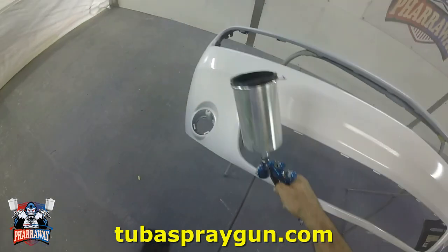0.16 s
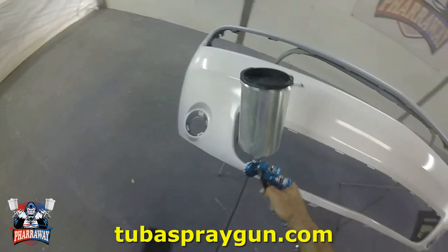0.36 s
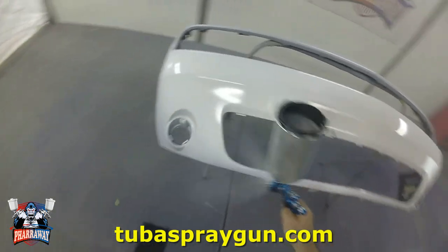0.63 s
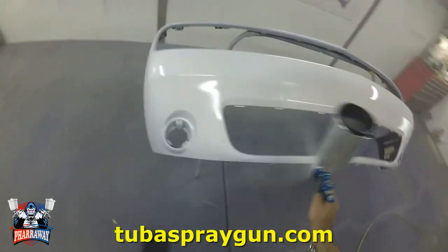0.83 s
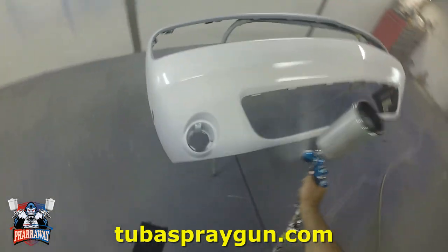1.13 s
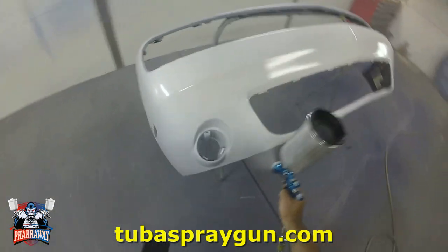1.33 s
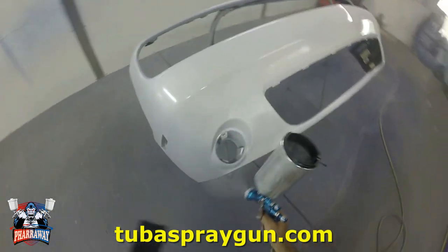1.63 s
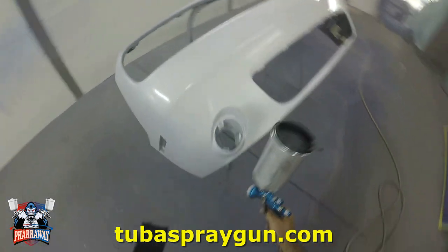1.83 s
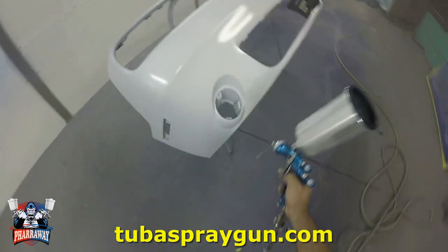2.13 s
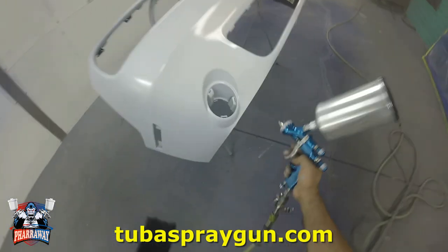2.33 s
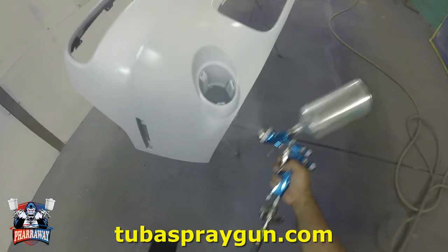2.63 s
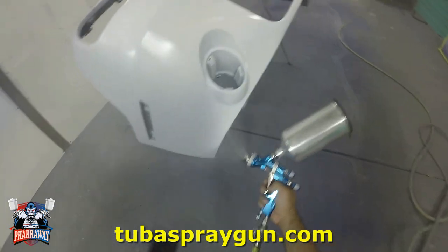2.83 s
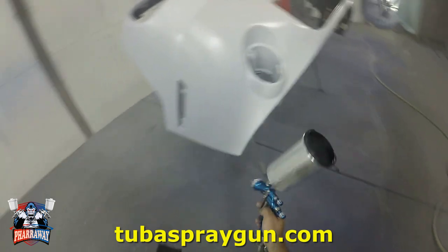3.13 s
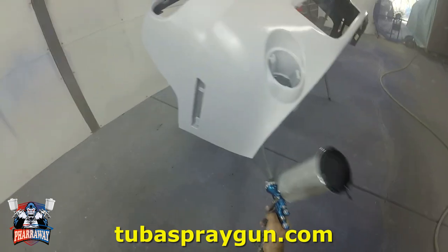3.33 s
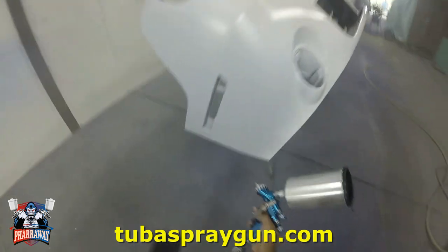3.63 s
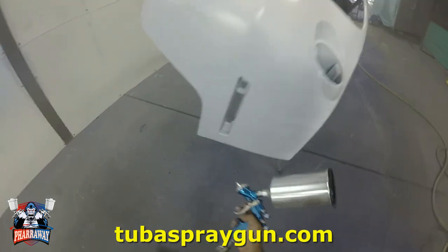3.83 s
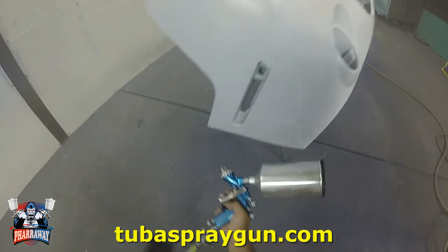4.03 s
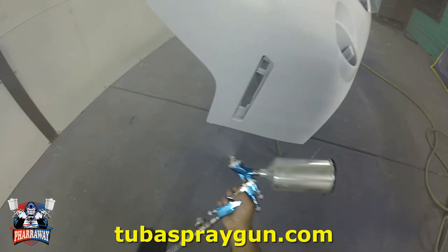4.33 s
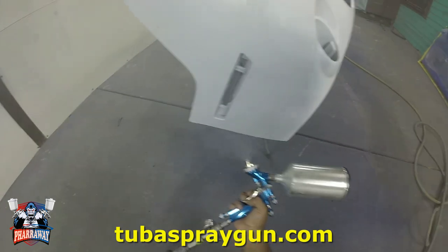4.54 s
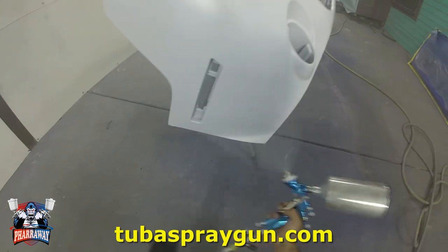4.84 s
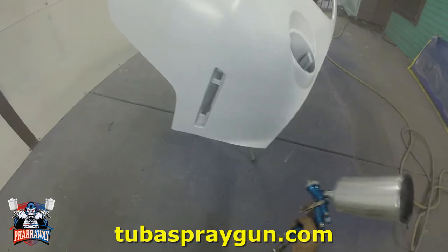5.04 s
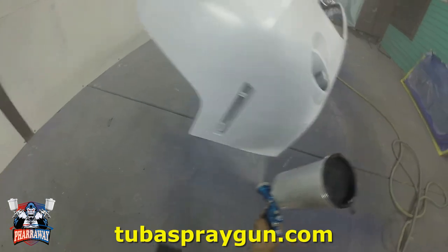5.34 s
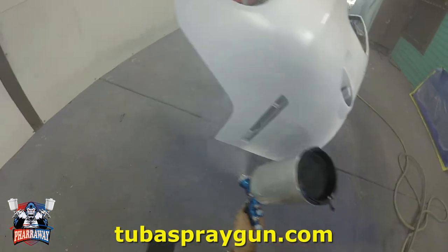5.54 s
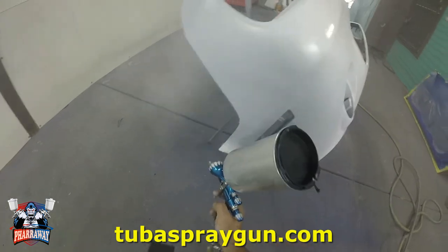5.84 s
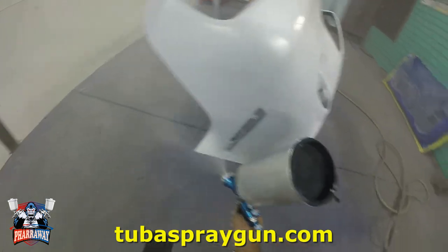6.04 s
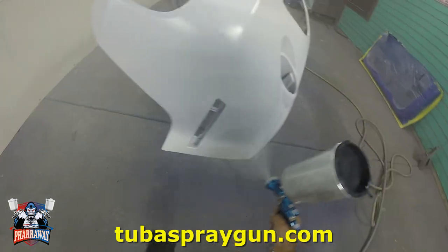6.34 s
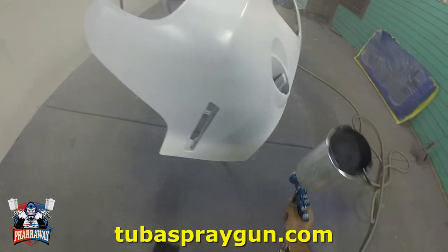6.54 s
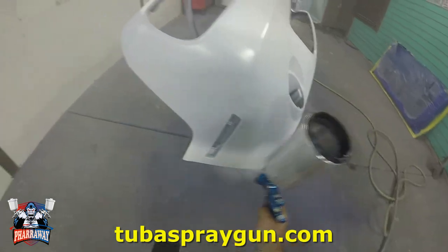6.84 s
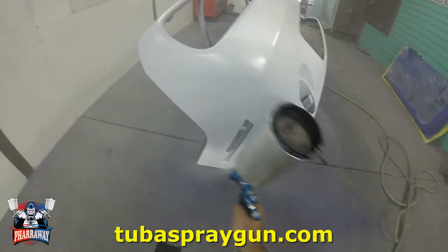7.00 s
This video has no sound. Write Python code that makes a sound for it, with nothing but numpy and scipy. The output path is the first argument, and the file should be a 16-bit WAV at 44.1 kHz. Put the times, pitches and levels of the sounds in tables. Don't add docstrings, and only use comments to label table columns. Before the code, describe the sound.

In a reverberant spray booth, a paint gun fires bright hissing bursts, each opening with a sharp surge and closing quickly into a short wall tail. Air roars softly on a hollow panel. Extractor rush and low hum fill the pauses. A small body-worn camera in a plastic housing colours everything, rumbling with movement, and takes a hard knock during a midway pause.

```python
import sys
import numpy as np
from scipy import signal
from scipy.fft import rfft, irfft, next_fast_len
from scipy.io import wavfile
from scipy.ndimage import uniform_filter1d, map_coordinates

SR = 44100
rng = np.random.default_rng(int(sys.argv[2]) if len(sys.argv) > 2 else 0)


def boost(x):
    u = np.asarray(x, float) / 20
    return 10 ** u


def generate_wav(signal):
    frames = np.transpose(np.atleast_2d(signal))
    scaled = np.clip(frames, -1, 1) * 32767
    pcm = np.round(scaled).astype(np.int16)
    wavfile.write(sys.argv[1], SR, pcm)


N = 316197


def set_level(x, db):
    return x * boost(db) / np.sqrt(np.mean(x ** 2))


def colour(x, gain):
    size = next_fast_len(len(x))
    hz = np.maximum(np.arange(size // 2 + 1) * SR / size, 1)
    return irfft(rfft(x, size) * gain(hz), size)[:len(x)]


def curve(table):
    hz, db = np.transpose(table)
    return lambda f: boost(np.interp(np.log(f), np.log(hz), db))


def wander(rate):
    k = int(SR / rate)
    held = np.repeat(rng.standard_normal(N // k + 1), k)
    return uniform_filter1d(uniform_filter1d(held, k), k)[:N]


def eddies(table, flicker_db, rate):
    noise = colour(rng.standard_normal(N), curve(table))
    f, s, cells = signal.stft(noise, SR, nperseg=512)
    held_s = np.arange(int(N / SR * 40) + 2) / rate
    chance = rng.standard_normal((len(held_s), 32))
    band = 2 * np.log2(np.maximum(f, 1))
    where = np.meshgrid(np.interp(s, held_s, np.arange(len(held_s))), band)
    flicker = 0.63 * map_coordinates(chance, where, order=1)
    return set_level(signal.istft(cells * boost(flicker_db * flicker), SR, nperseg=512)[1][:N], 0)


def patches(x, depth_db, rate):
    f, s, cells = signal.stft(x, SR, nperseg=512)
    chance = rng.standard_normal((40, 64))
    where = np.meshgrid(np.clip(s * rate, 0, 39), f / 420)
    field = 1.73 * map_coordinates(chance, where, order=1)
    return signal.istft(cells * boost(depth_db * field), SR, nperseg=512)[1][:N]


def ring(hz, t60, length):
    t = np.arange(int(length * SR)) / SR
    return np.sin(2 * np.pi * hz * t) * 1000. ** (-t / t60)


def burst(start, stop, db, gain):
    size = int((stop - start) * SR)
    return set_level(colour(rng.standard_normal(size), gain), db) * np.hanning(size)


def add(out, s, x):
    i = int(s * SR)
    out[i:i + len(x)] += x[:N - i]


def swells(t, events):
    return sum(db * np.exp(-((t - s) / length) ** 2) for s, db, length in events)


# pitch_hz, level_db (per Hz)
FAN_RUSH = [(40, 3.5), (70, -4), (128, -9), (200, -6), (400, -9.5), (1200, -12), (1700, -11), (1950, -19),
            (2500, -14.5), (3700, -21), (4100, -24), (6500, -31.5), (12000, -47), (15500, -52)]
# pitch_hz, width_hz, level_db
FAN_HUM = [(163.4, 20, -59.5), (305, 9, -64), (97.9, 26, -63.5)]
HUM_TREND = [-0.64, 1.95, 1]


def fan():
    out = set_level(eddies(FAN_RUSH, flicker_db=0.67, rate=6), -45.5)
    t = (np.arange(N) - N / 2) / SR
    for (hz, width, db), trend_db in zip(FAN_HUM, HUM_TREND):
        line = colour(rng.standard_normal(N), lambda f: 1 / (1 + (2 * (f - hz) / width) ** 2))
        out += set_level(line, db) * boost(trend_db * t)
    return out


# time_s, rise_db, length_s
STEPS = [
    (1.5, 8.5, 1),
    (3.9, 6, .4),
    (5.5, 5.5, .25),
    (6.9, 7, 0.22),
    (7.2, 17, 0.18),
]


def sway(t):
    rumble_curve = curve([(10, -25), (20, 3.5), (35, -0.5), (60, -19.5), (100, -14), (200, -86)])
    rumble = set_level(colour(rng.standard_normal(N), rumble_curve), 0)
    return rumble * boost(-53.5 + 2.5 * wander(1.3) + swells(t, STEPS))


# time_s, peak_db, sign_and_size, pitch_hz, t60_s
JOLTS = [
    (0.853, -29, -1.5, 22.6, 0.44),
    (.925, -27, -1.5, 23.8, 0.29),
    (1.427, -26.5, -1.15, 24.6, 0.26),
    (2.056, -24, -0.95, 25.6, 0.24),
    (2.719, -35, -1.4, 27, 0.28),
    (3.628, -10, 0.94, 39, 0.17),
    (3.659, -6.5, 0.43, 23.2, 0.21),
    (3.85, -40, -1, 28, 0.24),
]


def jolts():
    out = np.zeros(N)
    for s, db, sign, hz, t60 in JOLTS:
        jolt = ring(hz, t60, .5)
        build_up = 1 - np.exp(-np.arange(len(jolt)) / SR / 0.0096)
        add(out, s, sign * boost(db + 2.5) * jolt * build_up)
    return out


# time_s, peak_db, contact_samples
KNOCKS = [
    (3.675, -12, 15),
    (3.7907, -21.5, 40),
    (3.8037, -22.5, 17),
    (.851, -13, 190),
]
# pitch_hz, level_db, t60_s
SHELL = [(470, -13.5, 0.074), (810, 5.5, 0.033), (1170, -2.5, 0.034), (1490, -8, 0.029), (1860, -14, .012),
         (2440, -26, 0.014)]
# start_s, stop_s, level_db
RATTLE = (3.656, 3.70, -36)


def taps():
    out = np.zeros(N)
    buzz_curve = curve([(250, -23), (500, -9), (900, 4), (2000, -8.5), (3000, -53)])
    add(out, RATTLE[0], burst(*RATTLE, buzz_curve))
    push = np.hanning(26)
    for s, db, contact in KNOCKS:
        skin = np.hanning(int(contact))
        tap = sum(boost(g - 15.5) * ring(hz * (1 + 0.011 * rng.standard_normal()), t60, .08)
                  for hz, g, t60 in SHELL)
        tap[:len(push)] += push
        add(out, s, boost(db) * np.convolve(tap, skin / skin.sum()))
    return out


# pitch_hz, t60_s
BOOTH_T60 = [(500, 0.83), (2000, 0.56), (5000, 0.57), (9000, 0.53), (15000, 0.27)]


def booth(x):
    f, s, cells = signal.stft(x, SR, nperseg=256)
    keep = 1e6 ** (-s[1] / np.interp(f, *np.transpose(BOOTH_T60)))
    power = np.abs(cells) ** 2
    power[:, 0] /= 1 - keep
    stored = np.array([signal.lfilter([1 - k], [1, -k], row) for k, row in zip(keep, power)])
    noise = signal.stft(rng.standard_normal(N), SR, nperseg=256)[2]
    gain = np.sqrt(stored / np.mean(np.abs(noise) ** 2))
    tail = signal.istft(noise * gain, SR, nperseg=256)[1][:N]
    lag = int(.01 * SR)
    return boost(-3) * np.concatenate([tail[lag:0:-1], tail])[:N]


# start_s, stop_s, pitch_hz, level_db
WHISTLE = (3.24, 3.46, 760, -56)
# start_s, stop_s, level_db
LEAK = (4.232, 4.272, -48)


def small_air():
    out = np.zeros(N)
    start, stop, hz, db = WHISTLE
    add(out, start, burst(start, stop, db, lambda f: 1 / (1 + ((f - hz) / 15) ** 2)))
    add(out, LEAK[0], burst(*LEAK, curve(JET)))
    return out


# open_s, release_s, surge_db
PULLS = [
    (-.3, 0.246, 0),
    (0.625, 1.018, 9.5),
    (1.139, 1.805, 8),
    (2.563, 3.235, 12.5),
    (4.261, 5.073, 11.5),
    (5.201, 5.921, 8),
    (6.002, 6.608, 5.5),
    (6.716, 7.5, 5.5),
]


def stroke(t):
    opens, stops = np.transpose(PULLS)[:2]
    k = np.maximum(np.searchsorted(opens, t) - 1, 0)
    return np.maximum(t - opens[k], 0), np.maximum(stops[k] - t, 0)


def valve(t):
    open_s, shut_s, surge_s = 0.0026, 0.017, 0.028
    seep_db, seep_s = -22, 0.0036
    flow = np.zeros(N)
    for start, stop, surge_db in PULLS:
        since = np.maximum(t - start, 0)
        opened = (1 - np.exp(-since / open_s)) ** 2 * np.exp(-np.maximum(t - stop, 0) / shut_s)
        opened += boost(seep_db) * np.exp(-np.abs(t - start) / seep_s)
        flow += opened * boost(surge_db * np.exp(-since / surge_s))
    return flow


# pitch_hz, level_db (per Hz)
JET = [(530, -59), (900, -31), (1200, -24.5), (1300, -21), (1630, -15.5), (2250, -16.5), (2510, -7.5),
       (3940, -8), (4770, -3), (13300, -21.5), (15500, -25.5)]
# time_s, jet_level_db, turn_db (air cap turned toward the microphone)
WRIST = [(0, -29, 4), (.2, -30.5, 2), (.75, -29.5, 0), (1, -31, 2.5), (1.3, -30, 2), (1.62, -28, 0),
         (1.8, -30.5, 3.5), (2.65, -26.5, 1), (2.85, -28, 4), (3.15, -29.5, 0), (4.45, -28, 1),
         (4.78, -26, 3.5), (5.05, -29.5, 1.5), (5.36, -27.5, 0), (5.68, -27, -2), (6.24, -26.5, -1),
         (6.6, -29, 1.5), (7, -27.5, -2.5)]


def jet_hiss(t):
    since, _ = stroke(t)
    s, _, turn_db = np.transpose(WRIST)
    turn_db = np.interp(t, s, turn_db)
    jet = patches(eddies(JET, flicker_db=1.0, rate=33), depth_db=1.3, rate=3.5)
    jet = jet * boost(0.61 * wander(150))
    top = colour(jet, lambda f: 1 / (1 + (8500 / f) ** 8))
    body = colour(jet, lambda f: 1 / (1 + ((f - 2500) / 800) ** 4))
    fresh = np.exp(-since / 0.047)
    top_gain = boost(turn_db + 4.5 * fresh)
    body_gain = boost(0.2 * turn_db - 5 * fresh)
    return jet - top - body + top * top_gain + body * body_gain


# pitch_hz, level_db (per Hz)
PANEL = [(150, -31), (300, 2), (700, 4), (1500, 2.5), (2500, -2.5), (4000, -15)]
# time_s, roar_rise_db, length_s
HOLLOWS = [
    (.02, 4, .08),
    (1.3, 4.5, 0.077),
    (2.894, 6.5, 0.11),
    (4.694, 15, 0.043),
    (5.38, 3, .1),
    (5.774, 4, .08),
    (6.13, 3.5, 0.081),
    (6.38, 1.5, 0.12),
    (7.12, 12.5, 0.05),
]


def panel_roar(t):
    return eddies(PANEL, flicker_db=4.0, rate=15) * boost(-22 + swells(t, HOLLOWS))


def gun(t):
    s, jet_db, _ = np.transpose(WRIST)
    _, left = stroke(t)
    ease_db = -np.exp(-left / 0.1)
    jet_db = np.interp(t, s, jet_db) + ease_db
    flow = valve(t)
    spray = jet_hiss(t) * flow + panel_roar(t) * np.minimum(flow, 1.2)
    return spray * boost(jet_db - 2.0)


def bounce(x, t):
    near_ms, far_ms = .35, .8
    since, left = stroke(t)
    progress = since / (since + left + 1e-9)
    lag_ms = near_ms + (far_ms - near_ms) * progress + 0.071 * wander(3.7)
    lag = lag_ms * SR / 1000
    return x + .18 * map_coordinates(x, [np.arange(N) - lag], order=3, mode="nearest")


# pitch_hz, width_hz, change_db (boost or notch)
HOUSING = [(1197.6, 110, 7), (1345, 49, -7), (1605, 76, 2), (2306, 95, -10), (2437, 356, 4),
           (2770, 100, -9.5), (2848, 204, 6), (3133, 190, -3), (3545, 54, 5), (3990, 140, -3.5),
           (4800, 300, 0), (4730, 79, 5), (3496, 86, -2), (5260, 220, -2), (5510, 290, 2), (5750, 180, -1),
           (6710, 240, -4), (7180, 870, 2.5), (8230, 180, -2.5), (9100, 420, 1.5), (10130, 160, -7.5),
           (10800, 410, 1)]


def housing(f):
    return boost(sum(db / (1 + (2 * (f - hz) / width) ** 2) for hz, width, db in HOUSING))


def scene():
    t = np.arange(N) / SR
    spray = gun(t)
    air = bounce(spray, t) + booth(spray) + fan() + small_air()
    mono = colour(air, housing) + sway(t) + jolts() + taps()
    return np.array([mono, mono])


HOP = 1024
# time_s, step_db (above the local level)
THINNED = [(.262, 7), (.307, 8), (.400, 8), (.910, 9), (1.074, 9), (1.213, 9), (1.978, 9), (3.394, 8),
           (3.417, 8), (3.672, 4), (4.045, 7), (4.602, 9), (4.671, 9), (5.043, 7), (5.624, 7), (5.670, 8),
           (5.810, 8), (6.204, 8), (6.274, 9), (6.297, 9), (6.458, 7), (6.506, 10), (6.529, 10), (6.763, 7),
           (6.809, 8), (6.947, 7.5)]


def thin_out(x):
    grid = 190
    n = np.arange(2 * HOP)
    window = signal.windows.kaiser_bessel_derived(2 * HOP, 4 * np.pi)
    basis = np.cos(np.pi / HOP * np.outer(np.arange(HOP) + .5, n + .5 + HOP / 2)) * window
    out = x.copy()
    for s, step_db in THINNED:
        start = grid + HOP * (round((s * SR - grid) / HOP) - 1)
        lines = basis @ x[start:start + 2 * HOP]
        local = np.sqrt(uniform_filter1d(lines ** 2, size=40))
        step = boost(step_db - .5) * local ** .58 * np.percentile(local, 85) ** .42
        error = lines - step * np.round(lines / step)
        error[:5] = 0
        out[start:start + 2 * HOP] -= 2 / HOP * .96 * error @ basis
    return out


def hush(x):
    f, s, cells = signal.stft(x, SR, nperseg=2 * HOP)
    faint = uniform_filter1d(np.abs(cells), size=5, axis=0) < boost(-113)
    faint = faint & (f[:, None] > 12700)
    return signal.istft(np.where(faint, 0, cells), SR, nperseg=2 * HOP)[1][:N]


# time_s, low_hz, high_hz
SWAPPED = [(.083, 4100, 6500), (.083, 9600, 12000), (.966, 7500, 10500), (.966, 12400, 14000),
           (1.546, 10300, 12000), (3.032, 11700, 13200), (3.96, 5700, 7700), (3.96, 11000, 12500),
           (5.285, 7500, 9100), (5.285, 11000, 14600), (5.40, 11000, 12600), (6.399, 4100, 5300),
           (7.119, 5700, 7000)]


def swap(mono):
    out = np.array([mono, mono])
    fade = np.hanning(2 * HOP)
    for s, low_hz, high_hz in SWAPPED:
        part = slice(int(s * SR) - HOP, int(s * SR) + HOP)
        inside = lambda f: 1. * (f > low_hz) * (f < high_hz)
        band = colour(mono[part], inside)
        side = colour(rng.standard_normal(2 * HOP), inside)
        side = side * band.std() / side.std()
        out[:, part] += fade * (np.outer([.7, -.7], side) - .3 * band)
    return out


def low_pass(x):
    return signal.sosfilt(signal.butter(12, 16030, fs=SR, output="sos"), x)


def record(dry):
    top_hz = 15250
    mono = colour(dry[0], lambda f: np.clip((top_hz + 150 - f) / 300, 1e-3, 1) ** 2)
    mix = swap(hush(thin_out(mono)))
    return low_pass(mix)


dry = scene()
out = record(dry)
generate_wav(out)
```